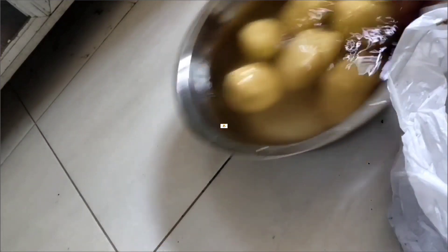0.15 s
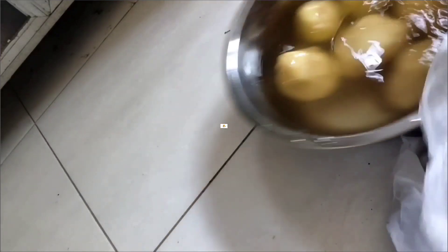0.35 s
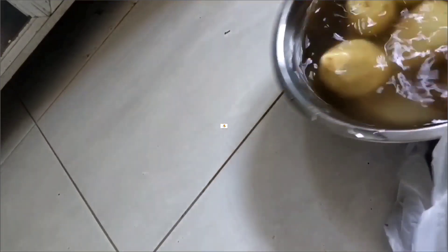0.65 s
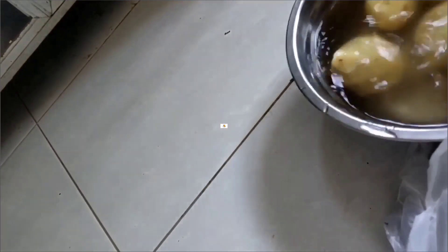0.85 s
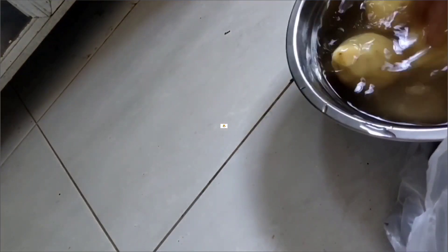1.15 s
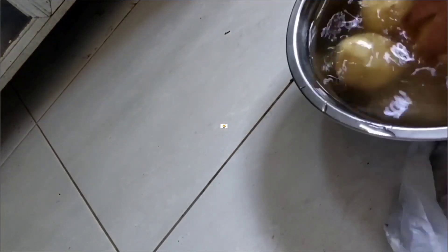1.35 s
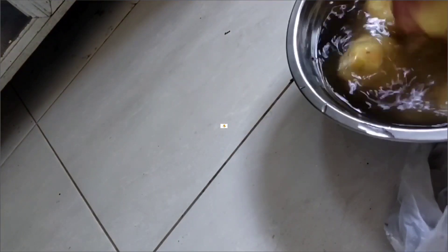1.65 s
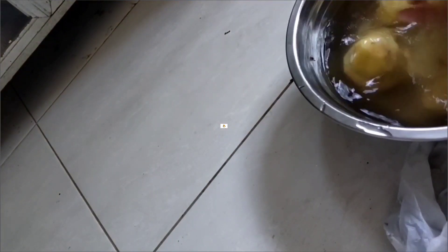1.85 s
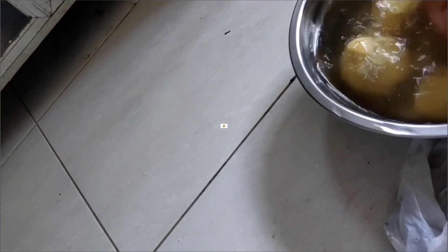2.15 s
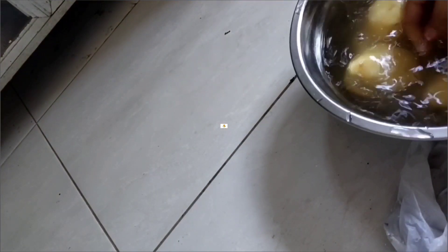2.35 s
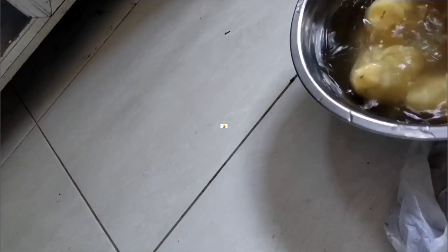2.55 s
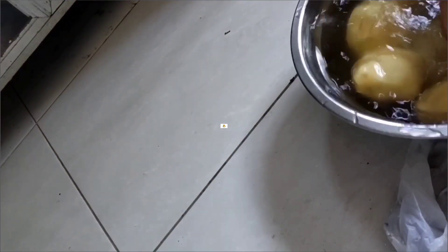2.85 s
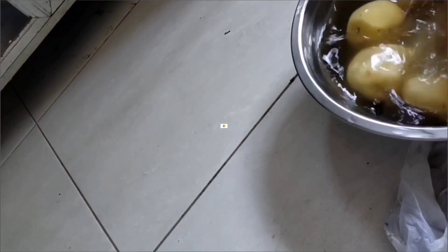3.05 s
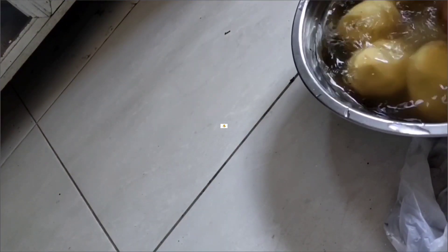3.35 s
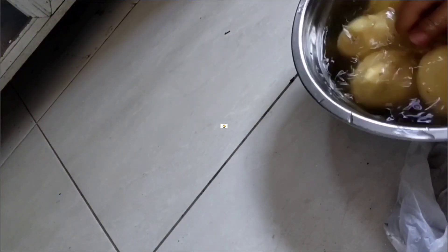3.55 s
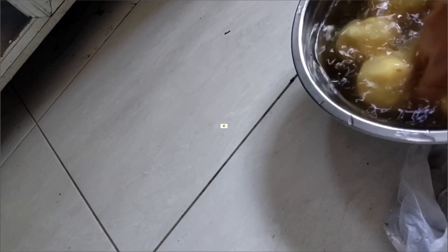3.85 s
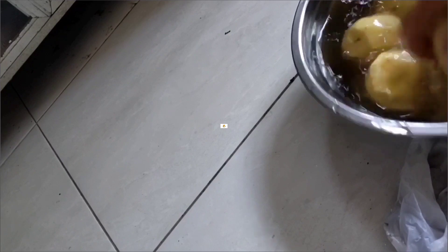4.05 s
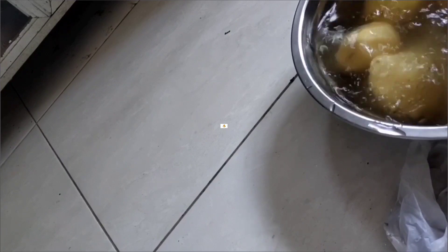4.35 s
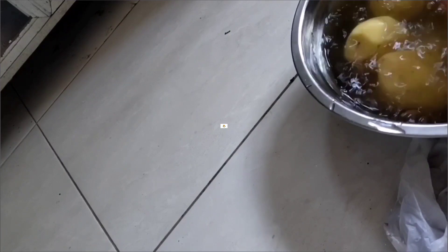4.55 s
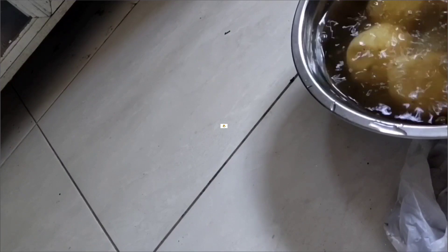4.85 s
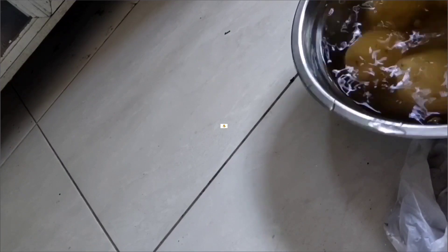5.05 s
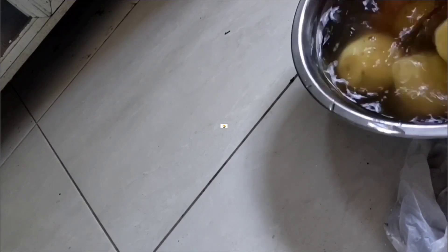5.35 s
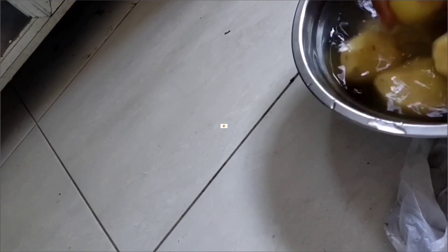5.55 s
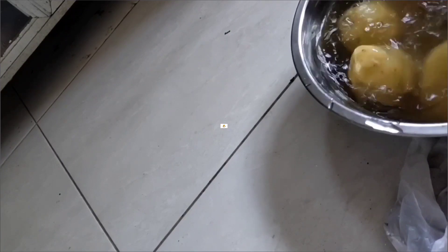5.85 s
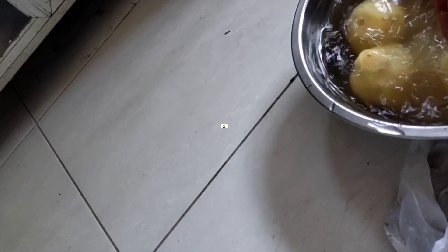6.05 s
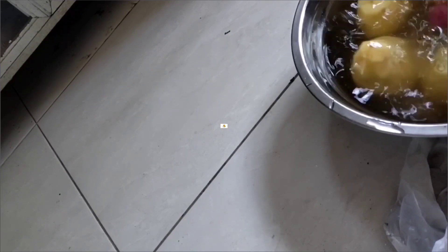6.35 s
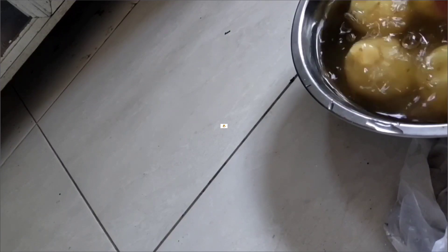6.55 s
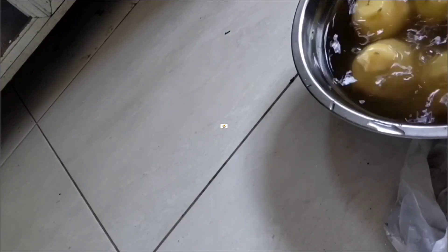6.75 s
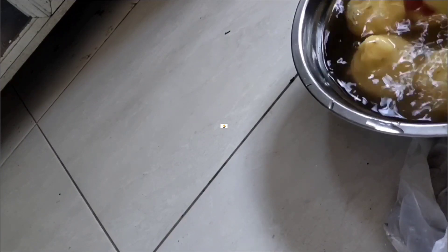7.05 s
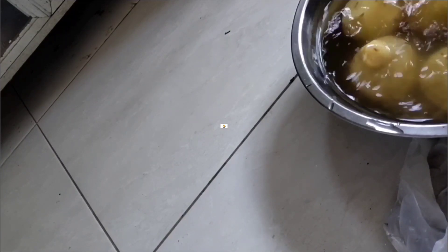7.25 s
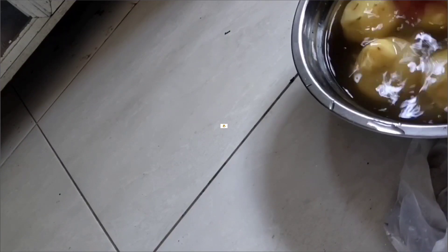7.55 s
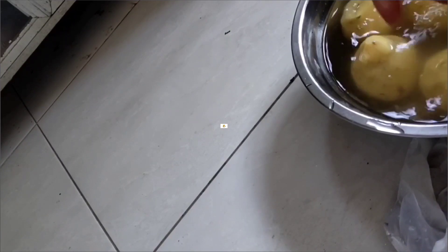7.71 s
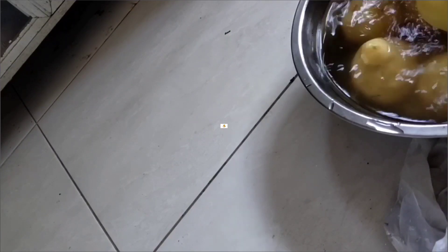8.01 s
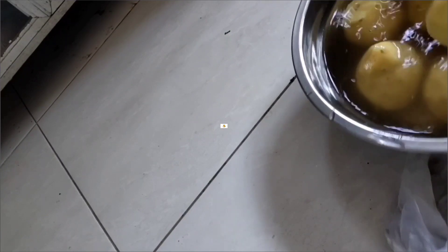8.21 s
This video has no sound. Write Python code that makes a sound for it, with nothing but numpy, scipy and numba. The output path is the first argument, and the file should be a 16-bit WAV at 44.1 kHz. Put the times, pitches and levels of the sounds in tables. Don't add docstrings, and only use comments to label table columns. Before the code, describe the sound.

From the start a wet metal bowl holding potatoes drags across floor tiles, a grainy bright hiss with a muted metallic grind, fading by about 1.3 s; dull potato bumps knock inside it. A short, harder scrape peaks near 1.6 s and dies before 2 s. From 1.8 s a hand stirs the water: a dense flurry of chirping bubbles, ticking drops and fizzy spray until about 3.2 s. A very sharp splashy snap hits at 3.35 s, then a lull. Around 4.2-4.45 s rising gulps and bright splashes burst out, thinning to drips. Smaller plops come near 5.4, 5.8 and 6 s, then sparse quiet trickles, a crisp pop at 7.6 s, and final drops at 8.35 s. Faint low machine hum swells and recedes underneath while the room rush fades. Close phone microphone, small hard room, short tail, treble hushed after sounds.

```python
import sys
import numpy as np
from scipy import signal
from scipy.fft import rfft, irfft
from scipy.io import wavfile
from scipy.ndimage import uniform_filter1d
from numba import njit

SR = 44100
rng = np.random.default_rng(int(sys.argv[2]) if len(sys.argv) > 2 else 0)


def dump(signal):
    limited = np.clip(np.atleast_2d(signal).T, -1, 1)
    pcm = np.round(limited * 32767).astype(np.int16)
    wavfile.write(sys.argv[1], SR, pcm)


def elevation(decibels):
    levels = np.asarray(decibels, float)
    return 10 ** (levels / 20)


N = 369558
TIME = np.arange(N) / SR

# t/s, hiss level/dB
DRAGS = [
    [(0.0, -30), (0.19, -24.5), (0.33, -27), (0.45, -29), (0.59, -27), (0.7, -30), (1.05, -29),
     (1.27, -36.5), (1.34, -51)],
    [(1.39, -47), (1.412, -42.5), (1.452, -39), (1.46, -29), (1.53, -27.5), (1.58, -21.5), (1.7, -30),
     (1.83, -33.5), (1.86, -44.5), (2.05, -61)],
]
# f/Hz, level/dB per Hz
HISS_SPECTRUM = [(600, -32), (1100, -8), (2000, -8.5), (4300, -2), (5900, -3), (7900, 1), (12500, -8),
                 (14900, 3), (16000, -2.5)]
# f/Hz, width/Hz, level/dB
BOWL_MODES = [(452, 30, -3), (790, 70, -2.5), (1185, 84, -9)]
# f/Hz, level/dB per Hz
AIR_SPECTRUM = [(25, -9), (48, -11), (180, -3.5), (400, -10.5), (900, -15.5), (1500, -13.5), (3000, -23.5),
                (6000, -24.5), (8000, -22), (12000, -23), (15200, -21.5)]
# f/Hz, width/Hz, level/dB
HUM_MODES = [(73.5, 4, 0.5), (120.5, 8, 3.5), (140, 12, -5), (97, 14, -5)]
# t/s, level/dB
MOTOR_LEVEL = [(0.0, -44.5), (0.56, -47), (0.7, -54), (1.4, -47.5), (2.29, -50), (3.08, -45.5), (3.66, -43),
               (4.6, -49), (5.06, -50.5), (5.51, -51), (5.7, -47.5), (6.3, -51), (7.1, -51), (8.38, -53.5)]
# t/s at the top, width/s, level/dB
SWELLS = [
    (.5, 0.13, -48),
    (1.7, 0.37, -63),
    (3.1, .4, -62),
    (4.8, .6, -52),
    (5.3, 0.3, -52),
    (7.0, .2, -56),
    (3.05, .2, -52),
    (8.1, 0.3, -60),
]
# t/s, peak level/dB, f/Hz
BUMPS = [(.2, -40, 480), (.245, -36, 800), (.455, -35, 770), (.592, -32.5, 460), (0.769, -31.5, 440),
         (.92, -28.5, 440), (1.0, -37, 460), (1.46, -31.5, 390), (1.528, -40.5, 438), (2.628, -42, 255),
         (3.794, -39.5, 350), (4.434, -32.5, 760)]
# t/s, peak level/dB
TICKS = [(1.411, -32), (1.97, -25), (2, -23), (2.1252, -28), (2.241, -33), (2.2734, -34), (2.3087, -28),
         (2.3406, -26), (2.471, -33.5), (2.6225, -30), (2.705, -29), (2.798, -28.5), (2.886, -42.5),
         (2.978, -32), (3.017, -33), (3.083, -31), (3.186, -31.5), (3.257, -27.5), (3.91, -40),
         (4.315, -25), (4.3518, -27), (4.437, -23), (4.6098, -35), (5.3668, -24.5), (5.7929, -27.5),
         (5.97, -27), (6.065, -27.5), (6.7238, -27), (8.3397, -31.5), (8.368, -24.5)]
# t/s, level/dB, favoured bubble f/Hz
STIR = [(1.8, -49.5, 3160), (2.28, -40.5, 2900), (2.48, -55.5, 1400), (2.72, -45, 2600), (2.9, -51, 2000),
        (3.65, -49.5, 3200), (3.95, -58, 1600), (4.31, -43.5, 3000), (4.62, -54, 3600), (4.95, -62.5, 1600),
        (5.19, -54, 3000), (5.6, -53.5, 3200), (6.0, -49.5, 1800), (6.3, -61.5, 1400), (6.8, -74, 2600),
        (7.4, -74, 2500), (7.66, -62, 3300), (8.1, -88, 2500)]
# t/s, peak level/dB, f/Hz, ring/ms
PLINKS = [(1.9003, -27, 3560, 4.3), (1.9497, -29, 1250, 3.1), (1.978, -32, 3450, 4.2),
          (1.9923, -30, 3365, 4.8), (2.1365, -29, 2860, 4.1), (2.171, -22.5, 1920, 1.9),
          (2.192, -27, 3340, 3.3), (2.2737, -26.5, 5260, 4.5), (2.7046, -25, 3270, 3),
          (3.501, -31.5, 2270, 5.1), (3.5889, -36.5, 2270, 3.3), (3.9895, -55, 5250, 6.9),
          (4.487, -28.5, 1920, 2.2), (4.647, -32.5, 4010, 2.5), (4.7895, -41, 3240, 1.8),
          (5.5643, -26, 2820, 1.4), (5.824, -22.8, 2193, 8.1), (5.8471, -28, 4920, 1.7),
          (6.337, -49, 4270, 15.9), (6.5009, -32.5, 4430, 1), (6.5266, -40, 3590, 11),
          (6.7229, -44, 8380, 11), (6.726, -43, 4930, 2.8), (6.9682, -53, 8140, 12),
          (7.2398, -48.5, 5240, 2.9), (7.4258, -36, 3360, 1.4), (7.4493, -46, 5210, 7),
          (7.8475, -40, 3390, 4.5), (7.9862, -44.5, 2720, 1.64), (8.3766, -36, 2800, 3),
          (4.782, -34, 1470, 2.8), (4.61, -46, 4200, 1.2), (5.727, -43.5, 4300, 1.3), (5.757, -41, 3730, 6),
         (5.848, -38.5, 1130, 7.1), (7.651, -49.5, 1540, 10), (3.74, -45, 4400, 2.8), (6.58, -48, 2650, 4),
         (7.1707, -48, 7440, 2.4), (6.4, -54, 3400, 5), (8.1313, -47, 15500, 3.2), (2.8, -44, 4140, 2.5),
         (3.273, -40.5, 2700, 4), (3.2, -37.5, 1900, 2.5), (3.31, -41.5, 4000, 1.5), (6.58, -51, 2000, 5),
         (7.155, -52, 1550, 8), (2.757, -40, 5300, 2), (2.741, -38, 5300, 1.5), (3.124, -41, 4200, 1.5),
         (4.088, -43, 4400, 2), (4.21, -43, 4200, 2), (4.522, -42, 5500, 5), (4.79, -45, 3200, 4),
         (4.85, -51, 3100, 4), (4.935, -53, 2300, 5), (4.898, -56, 5600, 4), (7.018, -54, 5500, 4),
         (3.269, -40, 7700, 1), (3.8, -42, 8500, 3), (3.8, -47, 5200, 4), (3.909, -47, 8100, 3),
         (4.4, -41, 6100, 2.5), (7.452, -40, 9500, 2), (4.556, -43, 12200, 1.5), (4.555, -42, 14600, 1),
         (4.78, -50, 13800, 4), (2.46, -38, 1250, 6), (5.5, -40, 1200, 4), (5.38, -41, 1600, 5),
         (2.25, -37, 2850, 6), (5.3, -52, 5800, 5), (3.988, -48, 8000, 5), (2.8, -40, 2900, 2),
         (2.14, -31, 900, 5), (5.562, -33, 2050, 3)]
# t/s, peak level/dB, start f/Hz, end f/Hz, ring/ms
GULPS = [
    (2.6518, -29.5, 1336, 1030, 11.3),
    (3.6714, -35.5, 4100, 4620, 1.5),
    (4.23, -23, 1700, 2000, 4.1),
    (4.2363, -19.5, 1560, 2280, 7.4),
    (4.2417, -16.5, 2500, 3500, 7.5),
    (5.367, -42, 3250, 3200, 9),
    (5.9872, -33, 1350, 1790, 4.6),
    (6.0798, -36, 1900, 1550, 6),
    (6.9703, -47, 4300, 4100, 4.5),
    (8.316, -45.5, 3410, 2840, 1.7),
]
# t/s, peak level/dB, f/Hz
POPS = [(2.0245, -32, 5300), (2.0676, -26, 10600), (2.643, -31, 5100), (3.083, -34, 13700),
        (3.2142, -29, 5270), (3.346, -22.5, 4800), (3.3484, -32, 15300), (3.3505, -33, 2900),
        (3.352, -19, 10800), (3.7995, -36, 14900), (3.9095, -49, 5900), (4.2337, -26, 14600),
        (4.234, -26, 7200), (4.236, -20.5, 2950), (4.274, -21.5, 4280), (4.896, -40, 14900),
        (5.8235, -29, 4480), (5.822, -23, 3170), (5.975, -37, 14600), (5.9965, -37, 7400),
        (6.0808, -34, 5600), (6.326, -39, 4260), (6.4448, -43, 4200), (6.967, -44, 6550),
        (7.16, -49, 13600), (7.4397, -29, 3450), (7.5868, -24, 7730), (7.5891, -17, 3810),
        (7.5997, -34, 11300), (8.3781, -27.5, 7320), (3.615, -44, 14500), (3.652, -42, 14800),
        (3.672, -40, 14300), (3.702, -45, 14000), (3.899, -39, 14500), (3.99, -45, 15000),
        (4.08, -42, 14800), (5.18, -42, 14800), (5.417, -42, 11500), (5.418, -44, 13200),
        (5.367, -38, 11000), (5.832, -32, 14500), (5.772, -44, 7200), (6.325, -49, 15000),
        (6.395, -50, 14500), (6.32, -52, 10100), (5.55, -46, 15000), (5.848, -38, 12500),
        (5.058, -54, 12500), (8.345, -38, 9000), (6.225, -55, 4000)]
# t/s, crack level/dB, pocket level/dB, pocket f/Hz
BURSTS = [(2.056, -22, -24, 7700), (2.1902, -19, -22.5, 4470), (2.4877, -34, -28, 6960),
          (2.5086, -33, -34, 5470), (2.6371, -24, -27, 1720), (2.9095, -29, -29, 12700),
          (3.3481, -10.5, -5, 8550), (3.8007, -34.5, -39, 12560), (3.9885, -43, -40, 9000),
          (4.0804, -33, -39, 5050), (4.2328, -25, -23.5, 8100), (4.8962, -43, -39, 13100),
          (5.754, -34.5, -46.5, 10350), (5.828, -20, -27, 10400), (5.9201, -26, -25, 9650),
          (6.4989, -36.5, -43.5, 9300), (6.5428, -48, -41, 11930), (7.4381, -25, -24.5, 9700),
          (7.5855, -26.5, -21, 5500), (7.8166, -31, -38.5, 9180)]
# t/s, peak level/dB, f/Hz
BLIPS = [(2.0557, -30, 2470), (2.1021, -34, 2020), (2.2393, -34, 2810), (2.3141, -31, 2840),
         (2.37, -36, 2170), (2.7302, -30, 1710), (2.7417, -32, 3300), (2.7935, -38, 2850),
         (2.9684, -35, 1820), (3.014, -37, 1700), (3.0619, -42, 2650), (3.0809, -40, 1780),
         (3.4261, -39, 4290), (3.6384, -44, 1640), (3.6854, -40, 2700), (3.6994, -42, 4370),
         (4.3094, -26, 3360), (4.3264, -31, 2630), (4.3894, -32, 3470), (4.6089, -40, 2500),
         (5.0449, -48, 2400), (5.1402, -40, 2340), (5.1517, -39, 3260), (5.1854, -38, 3520),
         (5.2629, -44, 3610), (5.4004, -41, 2910), (5.4485, -43, 2840), (5.6481, -41, 2950),
         (5.7254, -37, 1860), (6.5779, -45, 2590), (6.9394, -58, 4510), (7.1631, -63, 1640),
         (7.198, -60, 1600), (7.2265, -49, 2960)]
# t/s, peak level/dB, f/Hz
SPITS = [(2.1714, -28, 8480), (2.1844, -27, 7380), (2.2388, -32, 8940), (2.2674, -30, 7400),
         (2.3092, -24, 8320), (2.3524, -28, 8560), (2.4084, -39, 8760), (2.5092, -32, 8550),
         (2.6444, -28, 7960), (2.7033, -32, 8970), (2.7344, -33, 8700), (2.8514, -43, 7990),
         (2.9776, -36, 7900), (3.0135, -37, 8210), (3.0485, -41, 9390), (3.0704, -34, 8650),
         (3.0819, -28, 7990), (3.6436, -42, 8090), (3.7155, -40, 9140), (3.7499, -44, 8840),
         (4.0744, -35, 7970), (4.2887, -29, 7360), (4.3264, -28, 8560), (4.352, -23, 8340),
         (4.3884, -35, 8570), (4.4328, -23, 8950), (4.4847, -39, 8340), (4.6109, -37, 6760),
         (4.6463, -45, 8770), (4.779, -55, 8010), (5.0534, -56, 7540), (5.1492, -35, 7550),
         (5.1944, -38, 9370), (5.4016, -34, 8310), (5.4505, -37, 7130), (5.6476, -49, 9510),
         (7.0194, -58, 7990), (7.1896, -56, 7510), (7.6485, -40, 7430), (7.8466, -44, 8060)]
# t/s, length/s, level/dB, f/Hz, spread/octaves
SPLASHES = [(2.627, 0.037, -45.5, 1210, 2.1), (5.038, 0.094, -46, 214, 1.06),
            (5.132, 0.03, -50, 8500, 1.85), (5.437, 0.028, -48.5, 10800, 1.5),
            (4.611, 0.038, -54.5, 6800, .6), (4.981, .14, -66.5, 2850, 0.27),
            (5.605, 0.05, -66.5, 9600, 0.26), (6.336, 0.16, -68.5, 4100, 0.056),
            (6.484, .12, -62, 2610, 0.68), (6.75, .2, -64, 3350, .07), (6.722, .3, -65, 15100, 0.085),
            (7.22, 0.24, -63.5, 1750, 0.2), (4.51, .015, -52, 8500, .6), (2.79, .015, -48, 6000, 1.2),
            (3.63, .02, -54, 7000, 1), (3.19, .02, -50, 7000, 1.2), (6.78, .2, -72, 2750, .04),
            (4.07, .12, -55, 900, 1.1), (5.18, .03, -52, 5000, 1.8), (5.38, .05, -52, 6000, 1.6),
            (6.722, .05, -60, 7800, .5), (6.966, .03, -60, 5000, .9), (7.6, .12, -60, 4900, .8),
            (7.79, .08, -63, 8000, .4), (4.3, .035, -44, 3500, 1.3), (4.09, .07, -58, 6500, 1.1),
            (7.23, .36, -69, 1100, 0.12), (3.9, .18, -62, 3000, 0.22), (8.33, .05, -56, 1100, .8),
            (6.15, .4, -66, 1350, .4), (7.221, 0.039, -62.5, 3030, 0.32), (7.601, 0.22, -67, 3990, 0.054),
            (7.6, .2, -56, 5750, .07), (2.124, 0.028, -42, 1050, 1.57), (7.791, 0.044, -65, 2350, 0.59),
            (8.334, 0.046, -55, 3500, 1.2)]
# t/s, lowest band it shuts f/Hz
SHUT_ABOVE = [(0, 3500), (2.4, 3500), (3.7, 2185), (4.8, 2000), (6.12, 1900), (6.28, 920), (6.7, 830),
              (8.1, 789), (8.38, 557)]

GRIND_DB, RING_DB = -5, -15
GRIND_SLOPE, RING_SLOPE = 0.9, 0.94
AIR_DB, DRONE_DB = -50.5, -60.5
RUSH_DB, RUSH_DB_PER_S, RUSH_WALK_DB = -43, -2.08, -1
POP_MS, BLIP_MS, SPIT_MS, POCKET_LAG_MS = 1, 2.2, 0.7, 0.9
FIZZ_DB, FIZZ_SLOPE = -58.5, 1.25
CRACKLE_DB, CRACKLE_PER_S = -1, 80
ROOM_T60_S, ROOM_DB = 0.32, -5.5
TOP_HZ = 15680


def unit(x):
    return x / np.sqrt(np.mean(x ** 2))


def curves(table):
    s, *columns = np.transpose(table)
    ends_early = s[-1] < TIME[-1] - 0.3
    return [np.interp(TIME, s, c, left=-120, right=-120 if ends_early else c[-1]) for c in columns]


def colour(x, points):
    hz, db = np.transpose(points)
    f = np.maximum(np.arange(N // 2 + 1) * SR / N, 1)
    return irfft(rfft(x) * elevation(np.interp(np.log(f), np.log(hz), db)), N)


def band(x, lo_hz, hi_hz):
    sos = signal.butter(2, [lo_hz, min(hi_hz, 0.45 * SR)], "band", fs=SR, output="sos")
    return unit(signal.sosfilt(sos, x))


def modes(x, table):
    out = 0
    for hz, width, db in table:
        b, a = signal.iirpeak(hz, hz / max(width, 1), fs=SR)
        out = out + elevation(db) * unit(signal.lfilter(b, a, x))
    return out


def walk(rate):
    k = int(SR / rate)
    held = np.repeat(rng.standard_normal(N // k + 1), k)
    return 1.19 * uniform_filter1d(uniform_filter1d(held, k), k)[:N]


def shade(x):
    notch = signal.iirnotch(5950, 3.5, fs=SR)
    return 0.25 * x + 0.74 * signal.lfilter(*notch, x)


@njit
def grains(count, s, size, hz, end_hz, ring):
    out = np.zeros(count)
    for k in range(len(s)):
        turns, start = 0., int(s[k] * SR)
        for i in range(min(int(2.5 * ring[k] * SR), count - start)):
            age = i / (ring[k] * SR)
            envelope = min(age / .15, 1.) * np.exp(-.4 * age - .6 * age ** 3)
            out[start + i] += size[k] * envelope * np.sin(2 * np.pi * turns)
            turns += (hz[k] + (end_hz[k] - hz[k]) * min(age, 1.2)) / SR
    return out


def pockets(s, db, hz, end_hz, ms):
    ring = np.maximum(ms + 0 * s, 0.3) / 1000
    return grains(N, s, elevation(db), 1. * hz, 1. * end_hz, ring)


def swarm(count, centre_hz, octaves, cycles, spread_db):
    when, loud, pitch_a, vary, pitch_b = rng.random((count, 5)).T
    hz = centre_hz[(when * N).astype(int)] * 2 ** (octaves * (pitch_a + pitch_b - 1))
    hz = np.minimum(hz, 15500)
    size = elevation(spread_db * np.minimum(-np.log(1 - loud), 3.6))
    return unit(grains(N, when * N / SR, size, hz, hz * (1 + 0.15 * vary), cycles * (0.5 + vary) / hz))


def drag():
    hiss_db = np.max([curves(d)[0] for d in DRAGS], axis=0)
    roughness_db = 1.6 * walk(900) + 1.8 * walk(90) + 0.8 * walk(14)
    grit = colour(rng.standard_normal(N) * elevation(roughness_db), HISS_SPECTRUM)
    slips = uniform_filter1d((rng.random(N) < 60 / SR) * rng.random(N), size=60) * 60
    grit = grit * (1 + 1.17 * slips)
    shake = rng.standard_normal(N)
    ring = unit(modes(shake * elevation(2.5 * walk(45)), BOWL_MODES))
    ring = unit(ring + elevation(3.5) * band(shake, 170, 1300))
    over = hiss_db + 30
    hiss = band(grit, 7040, 14000)
    grind = elevation(GRIND_DB + (GRIND_SLOPE - 1) * over) * band(grit, 1100, 5160)
    ring = elevation(RING_DB + (RING_SLOPE - 1) * over) * ring * (hiss_db > -99)
    return elevation(hiss_db) * (hiss + grind + ring)


def air():
    return elevation(AIR_DB) * unit(colour(rng.standard_normal(N), AIR_SPECTRUM))


def hum():
    motor_db, = curves(MOTOR_LEVEL)
    drone = elevation(DRONE_DB) + sum(elevation(db) * np.exp(-((TIME - s) / width) ** 2) for s, width, db in SWELLS)
    rumble_cut = signal.butter(6, 60, "high", fs=SR, output="sos")
    drive = signal.sosfilt(rumble_cut, rng.standard_normal(N))
    rush_db = RUSH_DB + RUSH_DB_PER_S * TIME + RUSH_WALK_DB * walk(2.1) - 8.5
    rush = elevation(rush_db) * band(drive, 140, 820)
    motor = elevation(motor_db) * unit(modes(drive, HUM_MODES[1:]))
    return drone * modes(drive, HUM_MODES[:1]) + motor + rush


def drops():
    s, db, hz = np.transpose(BUMPS)
    out = grains(N, s, elevation(db), hz, hz, 4.0 / hz)

    s, db = np.transpose(TICKS + [b[:2] for b in BURSTS])
    crack = np.zeros(N)
    crack[(s * SR).astype(int)] = elevation(db - 1.5)
    swell = uniform_filter1d(crack, size=30)
    decay = np.exp(-1 / (0.0012 * SR))
    puff = rng.standard_normal(N) * signal.lfilter([1], [1, -decay], swell)
    out = out + colour(puff, HISS_SPECTRUM)

    s, db, hz, ms = np.transpose(PLINKS)
    out = out + pockets(s, db, hz, hz, ms) + pockets(*np.transpose(GULPS))
    s, db, hz = np.transpose(POPS)
    out = out + pockets(s, db, hz, hz, POP_MS)
    for table, ms in ((BLIPS, BLIP_MS), (SPITS, SPIT_MS)):
        s, db, hz = np.transpose(table)
        out = out + pockets(s, db - 1.5, hz, 1.04 * hz, ms)
    s, _, db, hz = np.transpose(BURSTS)
    return out + pockets(s + POCKET_LAG_MS / 1000, db, hz, 0.97 * hz, POP_MS)


def stir():
    gurgle_db, pitch_hz = curves(STIR)
    fizz_db = FIZZ_DB + FIZZ_SLOPE * (gurgle_db + 50)
    gust_db = 2.4 * walk(40)
    gurgle = swarm(count=5000, centre_hz=np.clip(pitch_hz, 900, 6000), octaves=1.1, cycles=9, spread_db=2.2)
    fizz = swarm(count=26000, centre_hz=np.full(N, 10500.), octaves=0.9, cycles=4, spread_db=3.2)
    hits = (rng.random(N) < CRACKLE_PER_S / SR) * elevation(3 * rng.standard_normal(N))
    decay = np.exp(-1 / (0.0008 * SR))
    crackle = unit(rng.standard_normal(N) * signal.lfilter([1], [1, -decay], hits))
    spray = elevation(gust_db) * fizz + elevation(CRACKLE_DB) * crackle
    gurgle = elevation(gurgle_db + gust_db - 3.5) * gurgle
    return shade(gurgle + elevation(fizz_db + 1.5) * colour(spray, HISS_SPECTRUM))


def splashes(cycles=5):
    out = 0
    for s, length, db, centre_hz, octaves in SPLASHES:
        when, pitch_a, pitch_b, loud = rng.random((400, 4)).T
        hz = np.clip(centre_hz * 2 ** (octaves * (pitch_a + pitch_b - 1)), 60, 15500)
        ring = (cycles + 1 / max(octaves, 0.02)) / hz
        size = elevation(db + 5 * loud) * np.sqrt(length / ring / 100)
        out = out + grains(N, s + length * when ** 1.25, size, hz, hz * 1.012, ring)
    return shade(out)


def room(x):
    t = TIME[:SR // 2]
    decay = rng.standard_normal(len(t)) * elevation(-60 * t / ROOM_T60_S)
    tail = decay * np.clip((t - 0.002) / 0.0013, 0, 1)
    tail = tail / np.sqrt(np.sum(tail ** 2))
    return x + elevation(ROOM_DB) * signal.fftconvolve(shade(x), tail)[:N]


def scene():
    return (room(drag() + stir() + drops() + splashes()) + air() + hum())[None]


@njit
def hold(x, fall):
    for i in range(1, x.shape[1]):
        x[:, i] = np.maximum(x[:, i], fall * x[:, i - 1])
    return x


def suppress(x, margin_db=7.0, steep=3.6, depth_db=-25, fall_db=-0.2428):
    hz, s, z = signal.stft(x, SR, nperseg=256, noverlap=192)
    power = uniform_filter1d(np.abs(z) ** 2, size=7, axis=1) + 1e-18
    heard = signal.stft(air(), SR, nperseg=256)[2][:, 1:45]
    rush = np.mean(np.abs(heard) ** 2, axis=1)
    doubt = elevation(2 * margin_db) * rush[:, None] / hold(power, min(elevation(2 * fall_db), 0.995))
    gain = hold(np.maximum(1 / (1 + doubt ** steep), elevation(depth_db)), elevation(-0.36))
    lowest_hz = np.interp(s, *np.transpose(SHUT_ABOVE))
    shut = np.clip((hz[:, None] / lowest_hz - 0.85) / 0.3, 0, 1)
    return signal.istft(z * gain ** shut, SR, nperseg=256, noverlap=192)[1][:N]


def band_limit(x):
    return signal.sosfilt(signal.butter(12, 16830, fs=SR, output="sos"), x)


def record(dry):
    top_cut = signal.ellip(8, 0.2, 27, TOP_HZ, fs=SR, output="sos")
    mix = signal.sosfiltfilt(top_cut, suppress(dry[0]))[None]
    return band_limit(mix)


dry = scene()
out = record(dry)
dump(out)
```